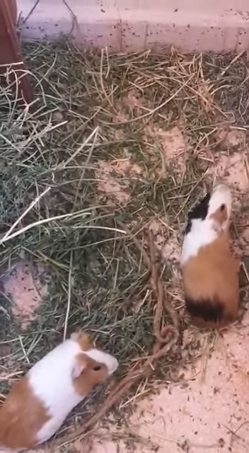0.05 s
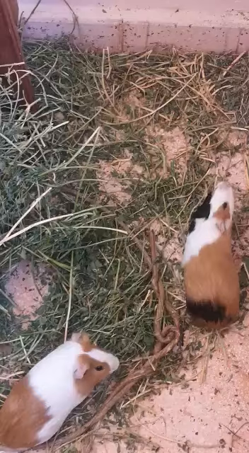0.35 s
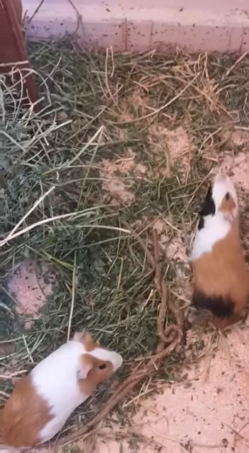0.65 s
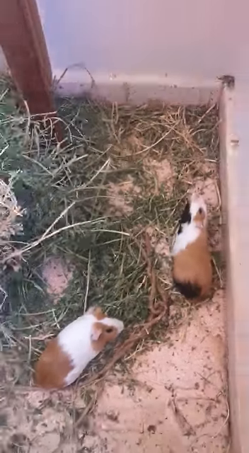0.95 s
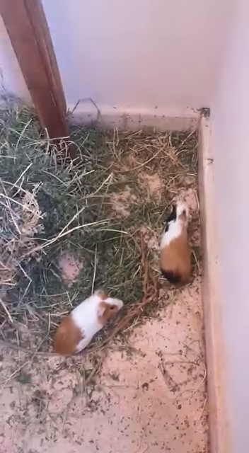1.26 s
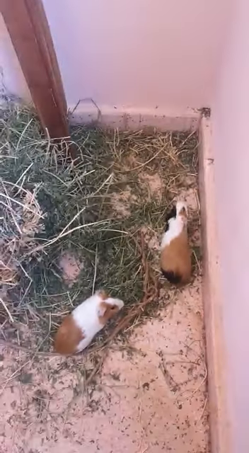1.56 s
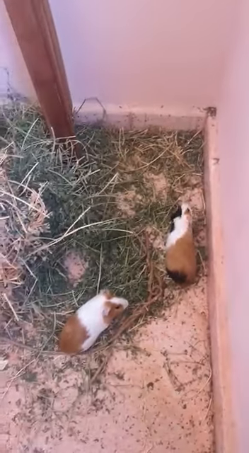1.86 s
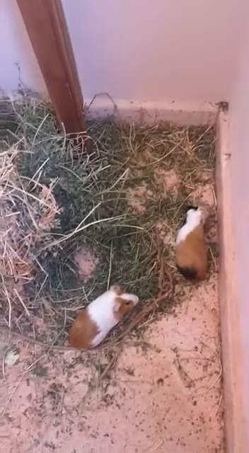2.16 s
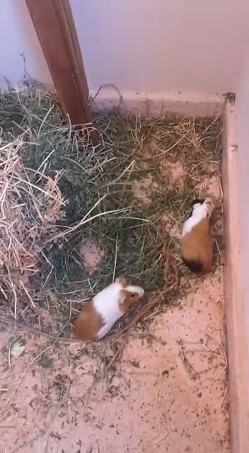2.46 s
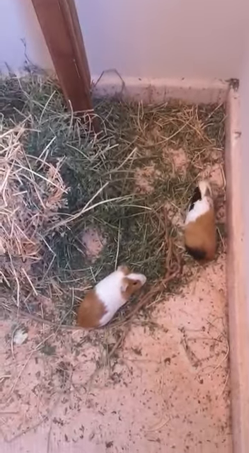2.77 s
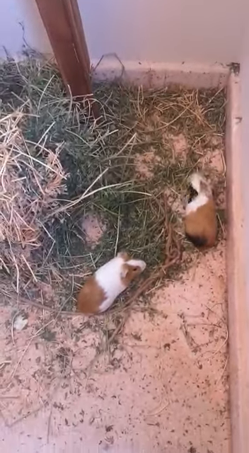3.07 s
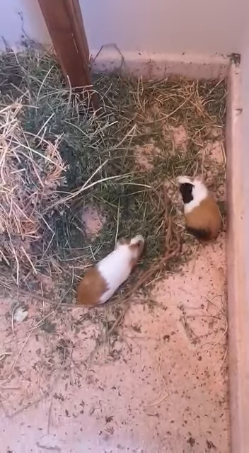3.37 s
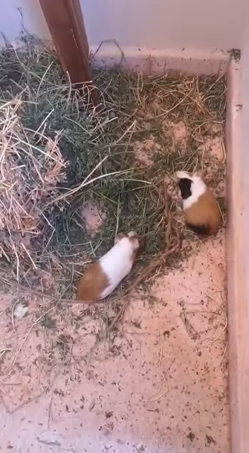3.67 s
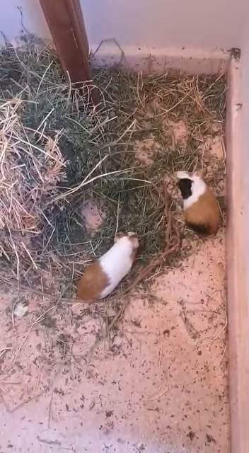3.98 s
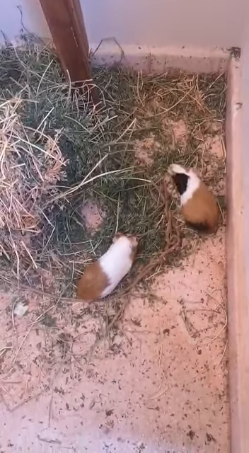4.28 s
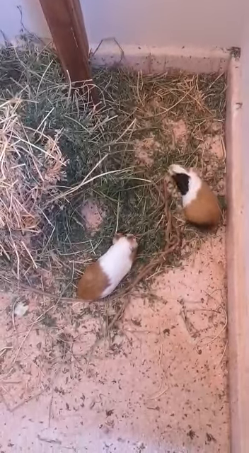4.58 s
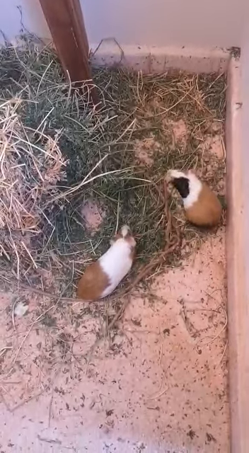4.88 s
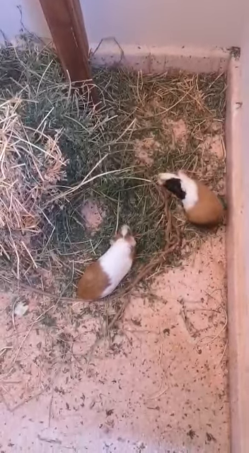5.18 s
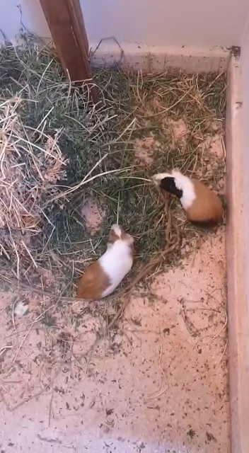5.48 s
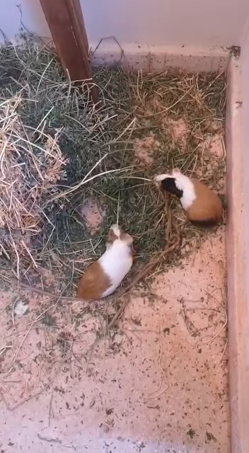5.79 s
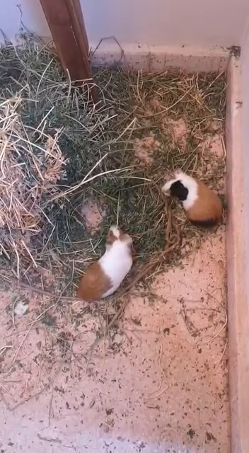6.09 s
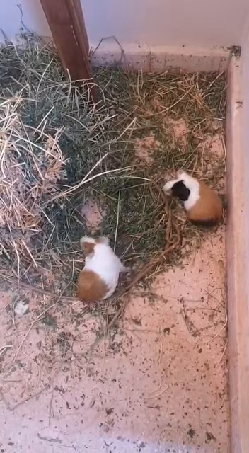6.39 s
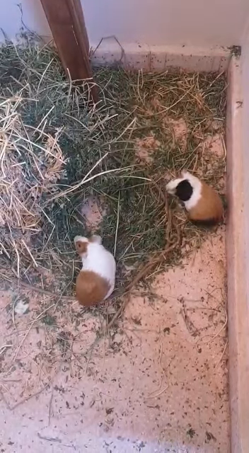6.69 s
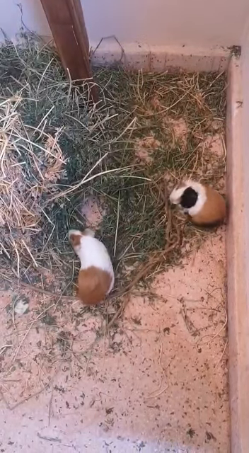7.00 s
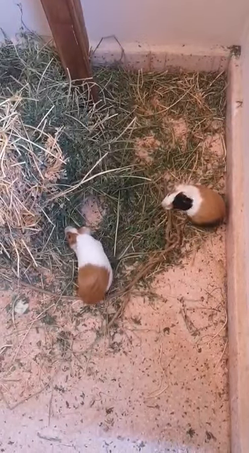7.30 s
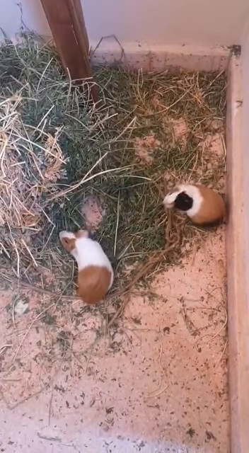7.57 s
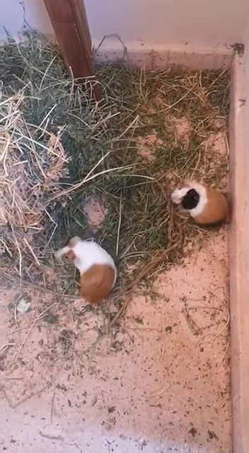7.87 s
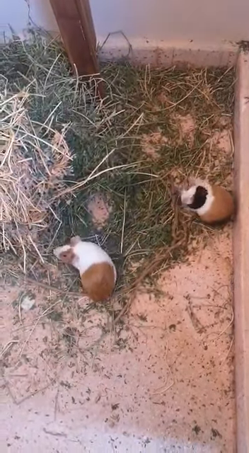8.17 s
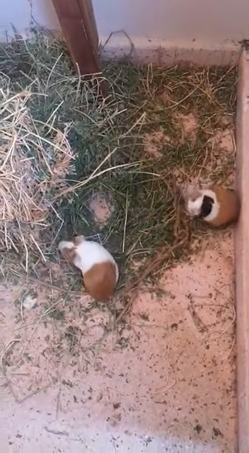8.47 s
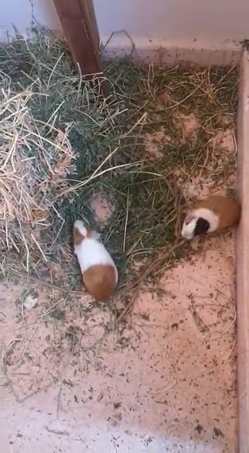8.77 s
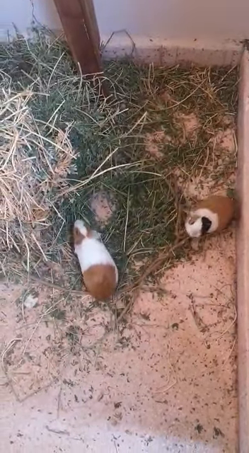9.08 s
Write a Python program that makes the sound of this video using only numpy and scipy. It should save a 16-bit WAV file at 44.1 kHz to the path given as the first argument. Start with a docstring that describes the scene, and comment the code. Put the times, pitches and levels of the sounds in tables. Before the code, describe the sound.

A guinea pig squeals in quick rising calls, then clucks softly, with faint hay rustling, birds and distant traffic rumble.

```python
"""A guinea pig wheeks about three times a second in a walled pen, a metre or two below a hand-held phone.
Its vocal folds scoop through a low note, then mostly break upward into a squeal; later it mainly clucks.
Hay stalks snap underfoot. Outside, songbirds whistle and a small owl hoots over far engines, rumble and
hiss. The phone turns the lows and highs down between calls."""
import sys
import numpy as np
from scipy import signal
from scipy.fft import rfft, irfft, next_fast_len
from scipy.io import wavfile
from scipy.ndimage import uniform_filter1d

SR = 44100
rng = np.random.default_rng(int(sys.argv[2]) if len(sys.argv) > 2 else 0)


def wrap_up_sound(samples):
    """Save the sound to the file named by the first command line argument, as 16-bit audio."""
    columns = np.atleast_2d(samples).T
    # keep every value between -1 and 1, then stretch to whole-number steps
    tamed = np.clip(columns, -1, 1)
    steps = np.round(tamed * 32767).astype(np.int16)
    wavfile.write(sys.argv[1], SR, steps)


N = 403074
TIME = np.arange(N) / SR
TOP_HZ = 15700

# wheeks: (start [s], low note [Hz], scoop [s], knee [Hz], squeal [s], end [Hz], bend [1 even, >1 late],
# low note [dB], knee [dB], end [dB], hoarseness [0-1])
WHEEKS = [ (0.045, 564, .125, 1210, 0.12, 3530, 1.39, -38.5, -37, -34, 0.11),
          (0.423, 600, .098, 1185, 0.02, 2170, 1.14, -42.5, -41.5, -34, 0.17),
          (0.695, 622, .117, 1234, 0.045, 1093, 1.7, -40.5, -42.5, -49, 0.32),
          (0.975, 630, 0.14, 1093, 0.037, 1003, 1.05, -41.5, -43.5, -47, 0.22),
          (1.284, 570, 0.13, 1213, 0.07, 2170, 3.96, -45.5, -48.5, -39.5, 0.39),
          (1.641, 520, 0.11, 1174, 0.016, 1940, 1, -51.5, -47.5, -40.5, 0.43),
          (1.94, 478, 0.11, 1156, 0.012, 1290, 1.4, -49.5, -45, -48, .4),
          (2.23, 476, 0.091, 1054, 0.02, 1320, 1.2, -54.5, -48, -52.5, 0.49),
          (2.51, 495, 0.11, 1018, 0.021, 1560, 1.03, -51, -48.5, -49, .5),
          (2.81, 522, 0.11, 1153, .178, 4110, 1.43, -50, -49.5, -38.5, .33),
          (3.243, 482, 0.097, 1202, .153, 4463, 1, -42, -41, -43, 0.52),
          (3.605, 460, 0.11, 1329, 0.11, 2970, .9, -47.5, -45.5, -46.5, 0.96),
          (3.945, 480, .12, 1303, 0.086, 1950, 1.24, -52, -49, -40, 0.92),
          (4.28, 520, 0.11, 1149, 0.12, 2053, 1.21, -46, -45.5, -39, 0.67),
          (4.615, 527, .128, 1123, .148, 3030, 1.43, -42.5, -47, -38, 0.62),
          (5.014, 526, 0.11, 1138, 0.087, 2532, 0.82, -42.5, -42, -38, 0.75),
          (5.33, 545, .11, 1236, 0.021, 1496, 1.13, -47, -56.5, -49.5, 0.74),
          (5.603, 550, 0.12, 1240, 0.061, 1614, 0.54, -52, -52, -58.5, 0.67),
          (5.912, 522, 0.12, 1266, 0.047, 1495, 0.62, -55.5, -55.5, -57, 1),
          (6.064, 800, 0.061, 1544, .043, 1780, 0.93, -54.5, -52.5, -52, 0.9),
          (7.095, 667, .04, 1700, .08, 1251, .7, -49, -46, -56, 1),
          (8.291, 544, 0.089, 1159, 0.05, 1454, 0.8, -57.5, -51.5, -52, 1)]
# clucks: (start [s], low note [Hz], length [s], end [Hz], low note [dB], end [dB], mouth closure [0-1])
CLUCKS = [(6.349, 529.4, 0.11, 670, -53, -63, 0.3), (6.759, 535, 0.075, 560, -62.5, -71, .5),
          (7.014, 536, 0.084, 597, -54.5, -47.5, 0.6), (7.391, 541, 0.079, 604, -54.5, -56, 0.67),
          (7.651, 536.5, .1, 597, -54, -43.5, 0.94), (8.591, 564, .066, 760, -51.5, -61, 0.3),
          (8.809, 563, 0.078, 720, -50, -58, 0.16), (9.066, 580, 0.082, 596, -54, -62, 0.14)]
# throat, closed mouth and breath rasp responses: (frequency [Hz], gain [dB])
THROAT = [(470, -7.5), (620, -15.5), (850, -10), (1120, -3), (1350, 5.5), (1650, 6), (2100, 7), (2600, 7.5),
          (2880, 3), (3150, -9), (4200, -18.5), (6000, -27), (11000, -27)]
CLOSED_MOUTH = [(550, -8.5), (1120, 9.5), (1700, -7.5), (2600, -2), (11000, 2)]
RASP = [(450, -3.5), (750, -4.5), (1300, 7), (2000, 5.5), (2700, 11), (3200, 0.5), (4000, -7.5),
        (6000, -19), (11000, -25)]
# squeal, loudest just above the register break: (pitch [Hz], gain [dB])
SQUEAL_GAIN = [(1300, 1.5), (1700, -2), (2000, -2), (2500, 6.5), (2850, 1), (3400, -15.5), (4400, -14.5)]
# hoarseness, greatest on the steep climb: (pitch [Hz], share [0-1])
STRAIN = [(620, 0.3), (1000, 0.97), (1400, 0.93), (2400, 0.39), (4000, 0)]
# steps and tugs in the hay: (start [s], level [dB], decay [s])
STEPS = [(0.255, -92, 0.055), (0.774, -72, 0.044), (0.815, -67.5, 0.063), (1.04, -75, 0.082),
         (1.38, -67.5, 0.03), (3.345, -72, 0.16), (3.72, -77, 0.08), (4.482, -61, 0.052),
         (4.614, -58.5, 0.018), (5.097, -88, 0.069), (6.595, -66.5, 0.033), (7.128, -74, 0.15),
         (7.249, -55.5, 0.009), (7.802, -70.5, 0.036), (8.12, -71, 0.017), (8.606, -58.5, 0.02),
         (8.692, -68, 0.045), (8.866, -62.5, 0.024)]
# snapping stalks: (frequency [Hz], gain [dB])
STALK_SPECTRUM = [(400, -27), (1500, -6), (4000, 9.5), (7000, 9), (11000, 7.5), (15000, -2.5)]
# bird whistles: (start [s], length [s], from [Hz], to [Hz], level [dB], warble [share of pitch])
WHISTLES = [(0, 0.033, 2670, 2395, -42, 0.04), (0, 0.076, 5480, 4120, -55.5, 0.035),
            (0.075, 0.18, 4143, 3480, -58.5, 0.041), (1.914, 0.26, 2863, 2450, -46.5, 0.021),
            (2.291, 0.26, 4390, 3610, -62.5, 0.1), (2.623, 0.21, 6040, 7100, -73, 0.02),
            (2.665, 0.22, 2480, 2282, -45, 0.028), (3.242, 0.083, 2344, 2410, -52, 0.013),
            (3.346, 0.14, 2692, 2680, -43, 0.022), (3.405, 0.19, 6730, 7350, -64, 0.014),
            (3.656, 0.2, 5750, 6560, -60, 0.026), (4.013, 0.057, 5820, 5250, -62, 0.038),
            (4.08, 0.15, 2255, 2060, -44.5, 0.027), (4.201, .13, 5920, 5460, -55.5, 0.02),
            (4.326, 0.14, 5340, 5300, -57.5, 0.0133), (4.533, 0.07, 6570, 6300, -62, .023),
            (4.83, 0.151, 5120, 4910, -62.5, 0.017), (4.881, 0.097, 2714, 2687, -44.5, 0.058),
            (5.44, .15, 6480, 6800, -67.5, 0.0094), (6.222, 0.135, 2715, 2742, -50, .02),
            (6.318, 0.067, 2490, 2288, -47, 0.03), (6.961, 0.169, 2570, 2643, -46.5, 0.011),
            (7.559, 0.16, 2360, 2040, -47.5, 0.026), (8.318, 0.16, 2543, 2493, -52, 0.078),
            (8.641, 0.11, 4410, 4320, -61, .015), (8.83, 0.093, 2435, 2560, -54.5, 0.02),
            (8.94, 0.14, 2553, 2694, -47.5, 0.011), (8.95, .16, 4920, 5064, -59.5, 0.0073)]
# owl hoots: (start [s], level [dB])
HOOTS = [(1.079, -62), (3.71, -69), (6.379, -66)]
# far engines: (start [s], length [s], from [Hz], to [Hz], level [dB])
ENGINES = [(0.456, 0.37, 117.4, 107.9, -42.5), (6.85, 0.57, 131.9, 129.1, -46)]
# background spectra: (frequency [Hz], relative density [dB])
RUMBLE = [(15, -12.5), (23, -2.5), (28, 3.5), (37, -0.5), (50, 4), (62, 1), (78, -33), (110, -76)]
DRONE = [(60, -24.5), (82, -5.5), (102, 0), (135, -4), (175, -7.5), (230, -13.5), (330, -22.5),
         (500, -38.5)]
HUSH = [(150, -7.5), (260, -11), (330, 6.5), (420, -4.5), (700, -0.5), (1300, -3), (2000, -2), (2650, -9),
        (3200, -12), (4500, -25)]
HISS = [(1000, -25), (2500, -48), (3500, 0.5), (4600, 0), (6000, 2), (7700, 4), (8700, -2), (11000, -8.5),
        (15500, -12.5)]
# rumble and hiss envelopes: (time [s], level [dB])
RUMBLE_LEVEL = [(0, -39), (.15, -32.5), (.35, -40), (.85, -33.5), (1.09, -35), (1.18, -45.5), (2.6, -38),
                (2.78, -46), (3.5, -38.5), (3.97, -45), (4.36, -31.5), (4.65, -42.5), (6.24, -44),
                (9.14, -44.5)]
HISS_LEVEL = [(0, -70), (3.5, -71.5), (5.2, -71.5), (5.95, -75.5), (6.4, -72.5), (7.3, -72.5), (9.14, -71)]
# drone and hush envelopes: (time [s], drone [dB], hush [dB])
DRONE_HUSH_LEVEL = [(0, -47.5, -57), (.7, -47.5, -61.5), (1.5, -49.5, -64.5), (3.1, -48.5, -60.5),
                    (3.78, -48, -60.5), (4.2, -48, -61), (4.95, -48.5, -59), (5.7, -49.5, -63.5),
                    (9.14, -49.5, -63.5)]
# floor and wall echoes: (left delay [ms], right delay [ms], gain [dB])
ECHOES = [(2.9, 3.47, -25), (6.3, 5.5, -6.5), (10.4, 8.3, -15.5)]
# the corner's effect on the microphone ports, phone low and raised:
# (frequency [Hz], left minus right [dB], left lead [rad])
PORTS_LOW = [(507, -3.5, 3.1), (860, -2.5, 1.47), (1270, 0, 0.22), (1550, -18, 0.41), (1880, -12, 0.43),
             (1990, -23, 11), (2500, -10, 7.1), (2790, 5, 8.5), (3400, 4, 8.4), (15200, 5, 20.6)]
PORTS_HIGH = [(495, 3.5, 1.84), (820, 36, 1.9), (1050, -2.5, 1.96), (1500, -18, 0.38), (1830, -20, 2.4),
              (2150, 0.5, 3.25), (2774, 0, 0.96), (2860, 8.5, 4.56), (14900, -17, 42)]
# band the suppressor senses and passes: (frequency [Hz], gain [dB])
VOICE_BAND = [(500, -40), (1000, 0), (3200, 0), (4500, -40)]


def guinea_pig(voice_db=-1, cluck_hoarse=0.73, raised_s=1.85):
    """Wheeks (scoop, then squeal) and clucks (scoop only) in the pen; the phone is raised at raised_s."""
    calls = np.zeros(N)
    for start, low_hz, scoop_s, knee_hz, squeal_s, end_hz, bend, low_db, knee_db, end_db, hoarse in WHEEKS:
        opening = scoop(low_hz, scoop_s, knee_hz, low_db, knee_db)
        ending = squeal(knee_hz, squeal_s, end_hz, bend, knee_db, end_db) + [scoop_s, 0, 0]
        offset_s, hz, gain = contour(np.vstack([opening, ending]), fade_s=0.01)
        add(calls, start + offset_s, vocal_folds(hz, gain, hoarse, closure=0))
    for start, low_hz, length_s, end_hz, low_db, end_db, closure in CLUCKS:
        offset_s, hz, gain = contour(scoop(low_hz, length_s, end_hz, low_db, end_db), fade_s=0.006)
        add(calls, start + offset_s, vocal_folds(hz, gain, cluck_hoarse, closure))
    low = pen(calls * (TIME < raised_s), room_db=-6.5, ports=PORTS_LOW)
    raised = pen(calls * (TIME >= raised_s), room_db=-3, ports=PORTS_HIGH)
    return undb(voice_db) * (low + raised)


def scoop(low_hz, length_s, end_hz, low_db, end_db, onset_oct=0.5, settle_s=0.0125, climb_from=0.34):
    """Starts high and soft, settles on the low note, climbs: (time [s], pitch [Hz], level [dB])."""
    u = np.linspace(0, 1, 40)
    onset = 2 ** (onset_oct * np.exp(-u * length_s / settle_s))
    climb = np.clip((u - climb_from) / (1 - climb_from), 0, 1) ** 1.75
    hz = low_hz * onset * (end_hz / low_hz) ** climb
    db = np.interp(u, [0, 0.39, 0.65, 1], [low_db - 9.5, low_db, low_db - 1.5, end_db])
    return np.column_stack([u * length_s, hz, db])


def squeal(knee_hz, length_s, end_hz, bend, knee_db, end_db, break_hz=2283, jump_oct=0.153, reach_oct=0.402):
    """Sweep from the knee that jumps at the register break: (time [s], pitch [Hz], level [dB])."""
    u = np.linspace(0, 1, 60)[1:]
    sweep_hz = knee_hz * (end_hz / knee_hz) ** (u ** bend)
    above_oct = np.log2(sweep_hz / break_hz)
    nearness = np.clip(1 - abs(above_oct) / reach_oct, 0, 1)
    hz = sweep_hz * 2 ** (jump_oct * np.sign(above_oct) * nearness)
    db = knee_db + (end_db - knee_db) * u + lookup(hz, SQUEAL_GAIN)
    return np.column_stack([u * length_s, hz, db])


def vocal_folds(pitch_hz, gain, hoarse, closure):
    """Fold harmonics sweep through fixed throat resonances; strain adds jitter, shimmer and rasp."""
    size = len(pitch_hz)
    strain = hoarse * lookup(pitch_hz, STRAIN) + 0.35 * closure
    jitter = (0.0032 + 0.036 * strain) * walk(size, rate_hz=600.6)
    phase = 2 * np.pi * np.cumsum(pitch_hz * (1 + jitter)) / SR
    # louder calls press the folds harder: richer overtones
    effort = np.clip(np.log2(gain / undb(-41.5) + 1e-6), -2, 1)
    slope_db_per_oct = -8 + 2 * effort
    k = np.arange(1, 13)[:, None]
    harmonic_hz = k * pitch_hz
    partials = response(harmonic_hz, THROAT) * undb(slope_db_per_oct * np.log2(k)) * (harmonic_hz < TOP_HZ)
    partials *= response(harmonic_hz, CLOSED_MOUTH) ** closure
    partials /= np.sqrt(np.sum(partials ** 2, axis=0) / 2)
    shimmer_db = 2 * (1.03 + strain) * walk(size, rate_hz=223.14)
    voice = np.sum(partials * np.sin(k * phase), axis=0) * undb(shimmer_db)
    # air escapes once a cycle
    puffs = rng.standard_normal(size) * (1 + np.cos(phase))
    rasp = undb(-26 + 24 * strain) * unit(colour(puffs, RASP))
    return gain * (voice + rasp)


def hay(rustle_db=-3, snaps_per_s=1500, spread_db=6):
    """Each step snaps a fading flurry of stalks: many faint, a few sharp."""
    out, t = np.zeros(N), np.arange(SR // 3) / SR
    for start, db, decay_s in STEPS:
        sizes = undb(spread_db * np.minimum(rng.exponential(size=len(t)), 3.5))
        snaps = (rng.random(len(t)) < snaps_per_s / SR) * sizes * rng.choice([-1, 1], len(t))
        add(out, start, undb(db + rustle_db) * unit(snaps) * np.exp(-t / decay_s))
    return pen(colour(out, STALK_SPECTRUM), room_db=3.5, ports=PORTS_HIGH)


def birds(song_db=-1, direct_db=-9):
    """Warbling whistles, smeared by the yard they cross."""
    out = np.zeros(N)
    for *note, warble in WHISTLES:
        start, hz, gain = contour(glide(*note, bend=0.65, swell_db=5), fade_s=0.04)
        add(out, start, gain * undb(song_db) * tone(hz, warble, rate_hz=500))
    return undb(direct_db) * out + reverb(out, t60_s=0.66, treble_t60_s=0.4, build_s=0.00067)


def owl(pitch_hz=1224, hoot_s=0.23):
    """Far, level hoots that linger between the houses."""
    out = np.zeros(N)
    for s, db in HOOTS:
        start, hz, gain = contour([(s, pitch_hz, db), (s + hoot_s, pitch_hz, db)], fade_s=0.0654)
        add(out, start, gain * tone(hz, waver=0.006, rate_hz=32))
    return 0.42 * out + 0.67 * reverb(out, t60_s=0.81, treble_t60_s=0.57, build_s=0.035)


def engines():
    """Only the firing note of far traffic carries into the pen."""
    out = np.zeros(N)
    for note in ENGINES:
        start, hz, gain = contour(glide(*note, bend=0.71, swell_db=9), fade_s=0.1021)
        add(out, start, gain * tone(hz, waver=0.018, rate_hz=24.1))
    return out


def background():
    """Distant rumble and drone, alike at both ports, with a wide hush and a thin hiss."""
    s, *levels = np.transpose(DRONE_HUSH_LEVEL)
    drone_db, hush_db = (np.interp(TIME, s, db) for db in levels)
    rumble = undb(lookup(TIME, RUMBLE_LEVEL)) * air(RUMBLE, side_db=-45, flicker_db=-0.4)
    drone = undb(drone_db) * air(DRONE, side_db=-19.5, flicker_db=0.5)
    hush = undb(hush_db) * air(HUSH, side_db=2.1, flicker_db=-0.26)
    hiss = undb(lookup(TIME, HISS_LEVEL)) * air(HISS, side_db=0, flicker_db=-1)
    return rumble + drone + hush + hiss


def air(spectrum, side_db, flicker_db):
    """Coloured stereo noise that wavers gently."""
    mid, side = colour(rng.standard_normal((2, N)), spectrum)
    stereo = unit(mid) + undb(side_db) * unit(side) * np.array([[1], [-1]])
    return stereo * undb(flicker_db * walk(N, rate_hz=8.3))


def pen(x, room_db, ports):
    """Direct sound and close echoes reach the two ports differently; the room rings on."""
    size = next_fast_len(N + SR // 10)
    hz = np.fft.rfftfreq(size, 1 / SR)
    port_hz, lean_db, lead_rad = np.transpose(ports)
    left = undb(np.interp(hz, port_hz, lean_db)) * np.exp(1j * np.interp(hz, port_hz, lead_rad))
    pair = np.array([left, np.ones(len(hz))]) / np.sqrt((1 + abs(left) ** 2) / 2)
    out = irfft(rfft(x, size) * pair, size)[:, :N]
    for *delays_ms, db in ECHOES:
        out += undb(db) * np.array([np.interp(TIME - ms / 1000, TIME, x, left=0) for ms in delays_ms])
    return out + reverb(undb(room_db) * x, t60_s=0.24, treble_t60_s=0.17, build_s=0.015)


def reverb(x, t60_s, treble_t60_s, build_s):
    """Diffuse tail of unit energy, unrelated at the two ports; the treble dies sooner."""
    t = np.arange(SR) / SR
    noise = rng.standard_normal((2, SR))
    low = signal.sosfilt(signal.butter(2, 3500, fs=SR, output="sos"), noise)
    tail = low * undb(-60 * t / t60_s) + (noise - low) * undb(-60 * t / treble_t60_s)
    tail = unit(tail * (1 - np.exp(-t / build_s))) / np.sqrt(SR)
    return signal.fftconvolve(x[None], tail, axes=1)[:, :N]


def suppressor(x, unity_db=-49, db_per_db=0.14, window_s=0.041):
    """The gain of the lows and highs follows the level in the voice band."""
    voice = colour(x, VOICE_BAND)
    power = uniform_filter1d(np.mean(voice ** 2, axis=0), int(window_s * SR))
    gain = (np.sqrt(abs(power)) / undb(unity_db)) ** db_per_db
    return voice + gain * (x - voice)


def glide(start, length_s, from_hz, to_hz, peak_db, bend, swell_db):
    """Sliding note that swells and fades: (time [s], pitch [Hz], level [dB])."""
    u = np.linspace(0, 1, 30)
    hz = from_hz * (to_hz / from_hz) ** (u ** bend)
    db = peak_db - swell_db * (2 * u - 1) ** 2
    return np.column_stack([start + u * length_s, hz, db])


def contour(rows, fade_s, smooth_s=0.007):
    """Start [s], pitch [Hz] and gain of one note, with rounded turns and soft ends."""
    s, hz, db = np.transpose(rows)
    t = np.arange(s[0] - fade_s / 2, s[-1] + fade_s / 2, 1 / SR)
    pitch_hz = np.exp(uniform_filter1d(np.interp(t, s, np.log(hz)), int(smooth_s * SR)))
    edge_s = np.minimum(t - t[0], t[-1] - t)
    gate = np.sin(np.pi / 2 * np.clip(edge_s / fade_s, 0, 1)) ** 2
    return t[0], pitch_hz, gate * undb(np.interp(t, s, db))


def tone(pitch_hz, waver, rate_hz):
    """Sine of rms 1 with a wandering pitch."""
    hz = pitch_hz * (1 + waver * walk(len(pitch_hz), rate_hz))
    return np.sqrt(2) * np.sin(2 * np.pi * np.cumsum(hz) / SR)


def walk(size, rate_hz):
    """Smooth random curve, spread near 1."""
    knots = rng.standard_normal(size // 20 + 2)
    return 1.486 * np.interp(np.arange(size) * rate_hz / SR, np.arange(len(knots)), knots)


def colour(x, curve):
    """Filter by a (frequency [Hz], gain [dB]) curve."""
    size = next_fast_len(x.shape[-1])
    gain = response(np.fft.rfftfreq(size, 1 / SR), curve)
    return irfft(rfft(x, size) * gain, size)[..., :x.shape[-1]]


def response(hz, curve):
    """Gain of a curve at hz; falls 12 dB per octave past its last point."""
    curve_hz, db = np.transpose(curve)
    gain = undb(np.interp(np.log(np.maximum(hz, 1)), np.log(curve_hz), db))
    return gain / np.maximum(hz / curve_hz[-1], 1) ** 2


def lookup(x, table):
    """Interpolate a two-column table."""
    return np.interp(x, *np.transpose(table))


def add(out, start_s, x):
    """Mix x into out."""
    i = max(int(start_s * SR), 0)
    out[i:i + len(x)] += x[:max(N - i, 0)]


def undb(db):
    """Decibels to gain."""
    return 10 ** (np.asarray(db) / 20)


def unit(x):
    """Scale to rms 1."""
    return x / np.sqrt(np.mean(x ** 2))


def scene():
    """All sources at the two ports."""
    return guinea_pig() + hay() + birds() + owl() + engines() + background()


def record(dry):
    """The phone suppresses noise and cuts the top."""
    lowpass = signal.ellip(10, 0.2, 80, TOP_HZ, fs=SR, output="sos")
    return signal.sosfilt(lowpass, suppressor(dry))


dry = scene()
out = record(dry)
wrap_up_sound(out)
```